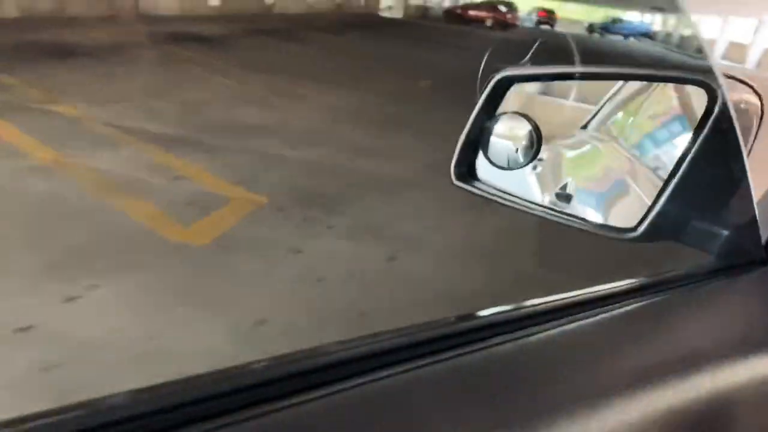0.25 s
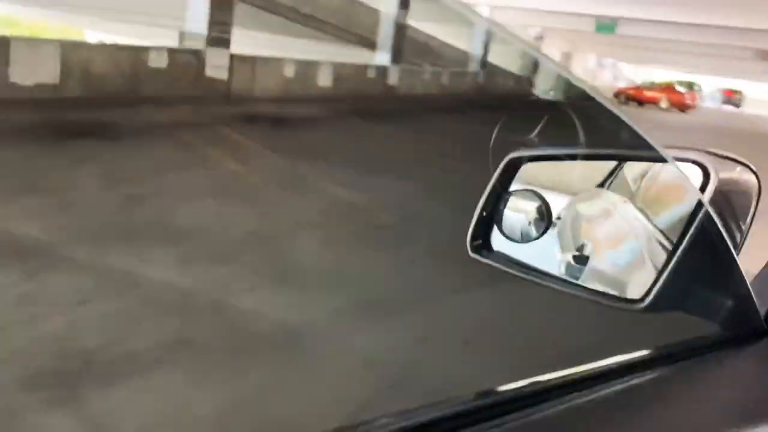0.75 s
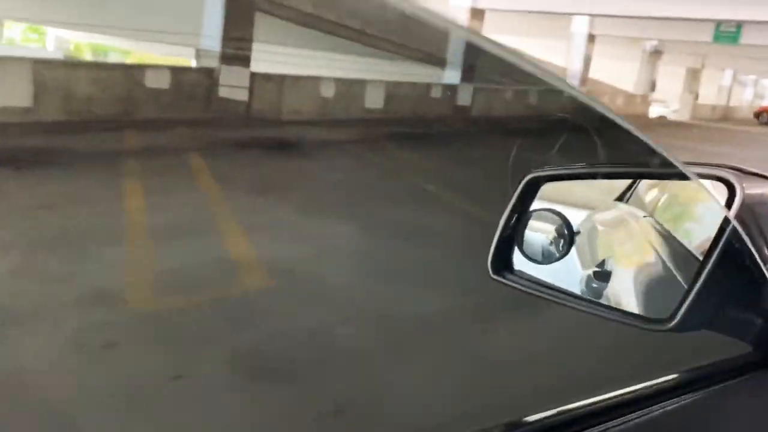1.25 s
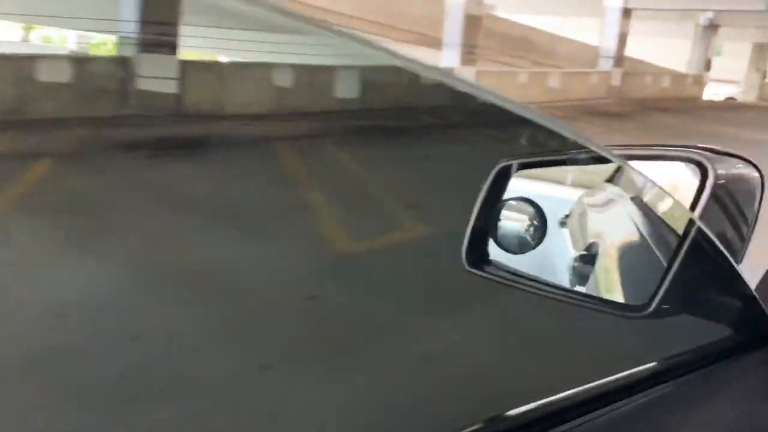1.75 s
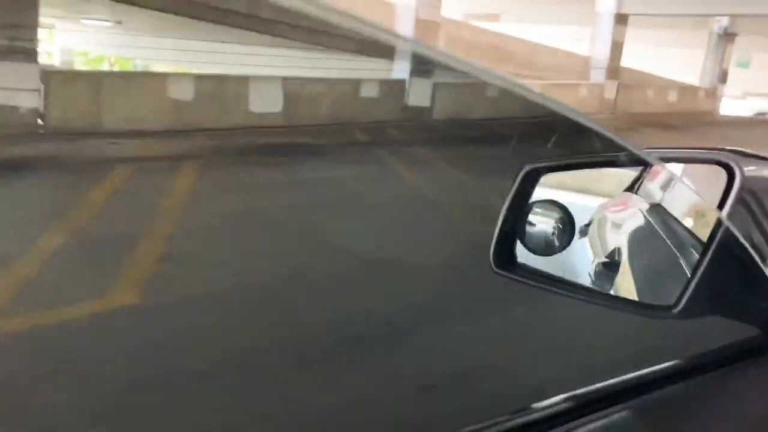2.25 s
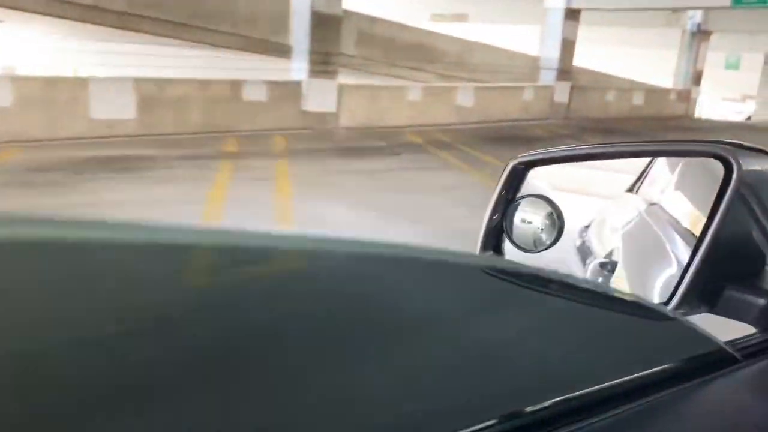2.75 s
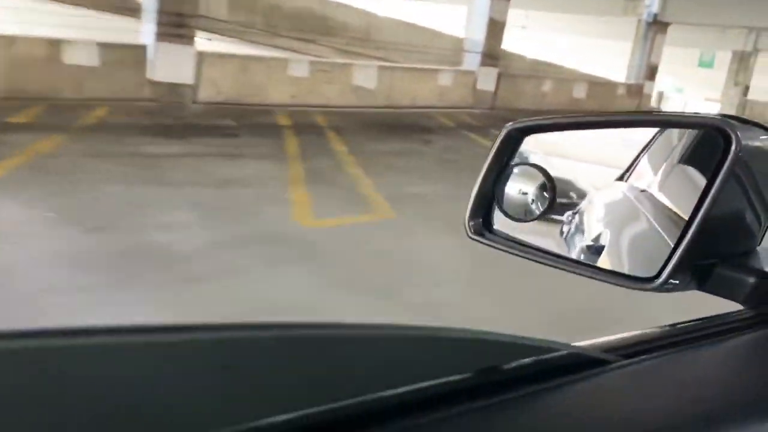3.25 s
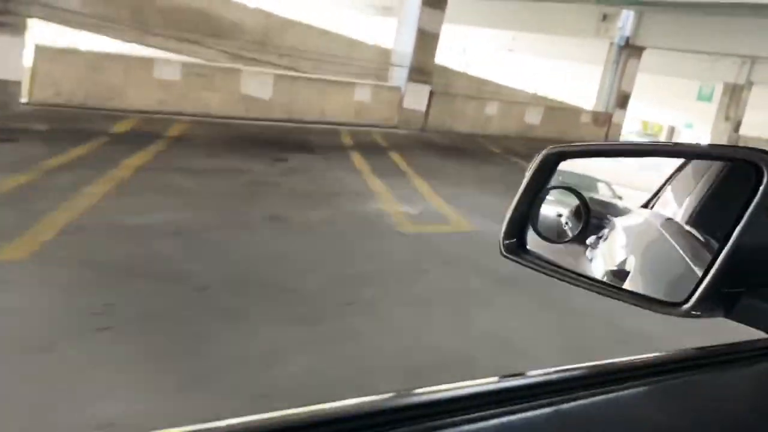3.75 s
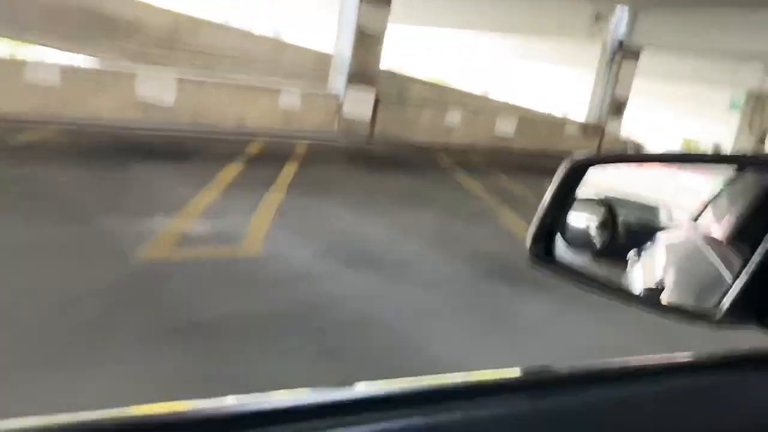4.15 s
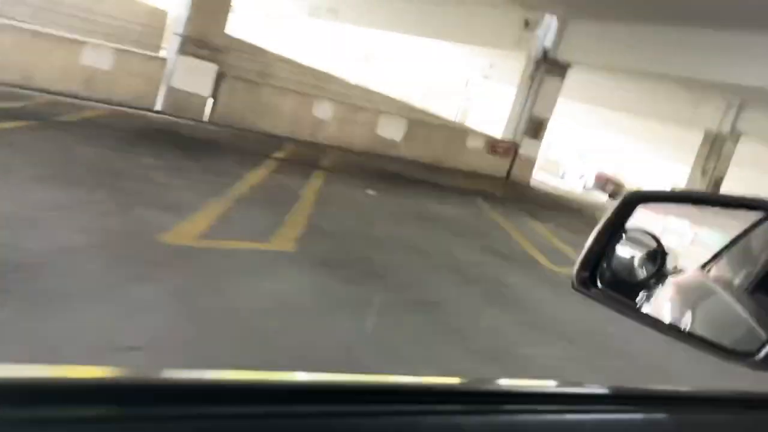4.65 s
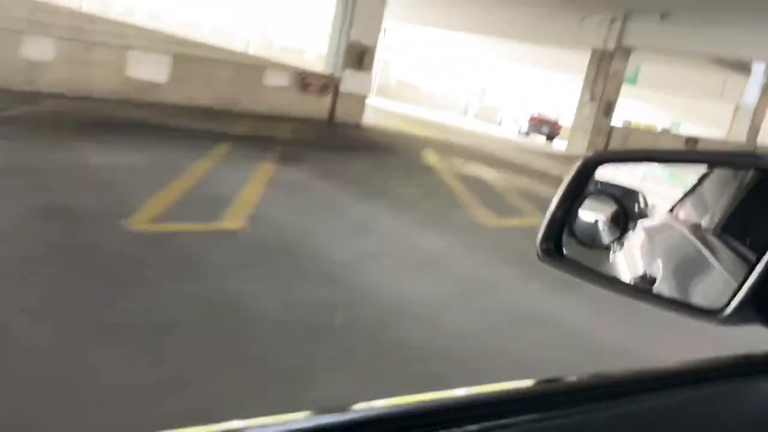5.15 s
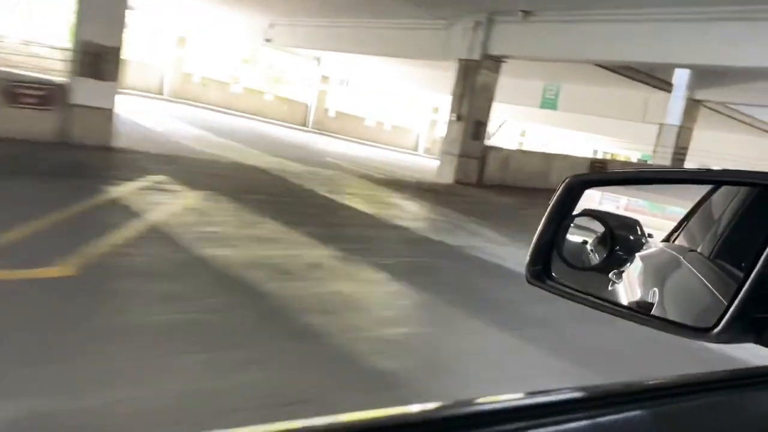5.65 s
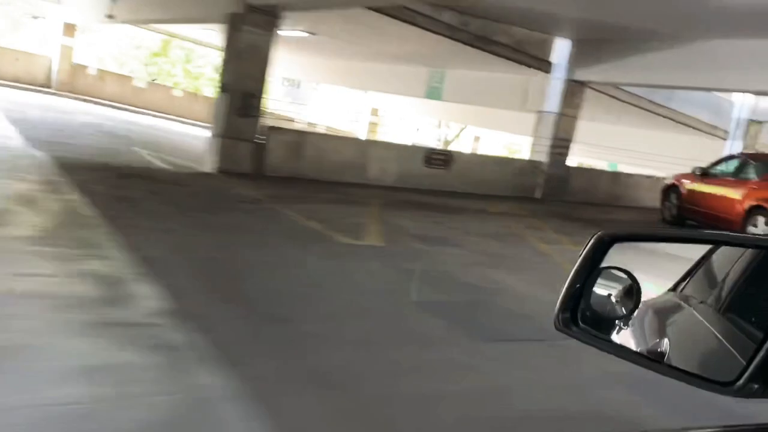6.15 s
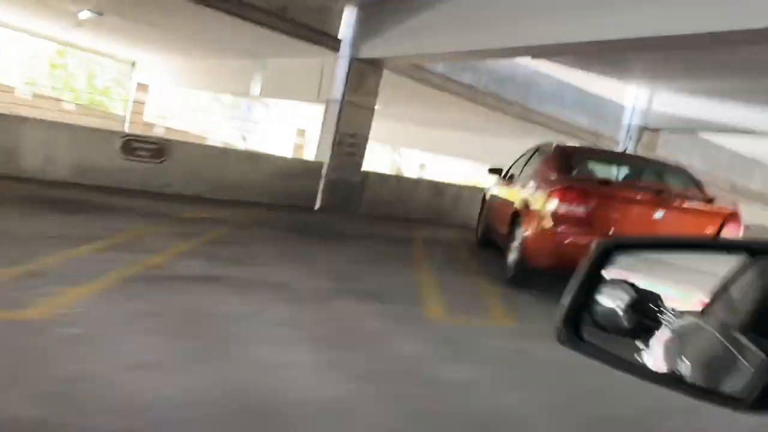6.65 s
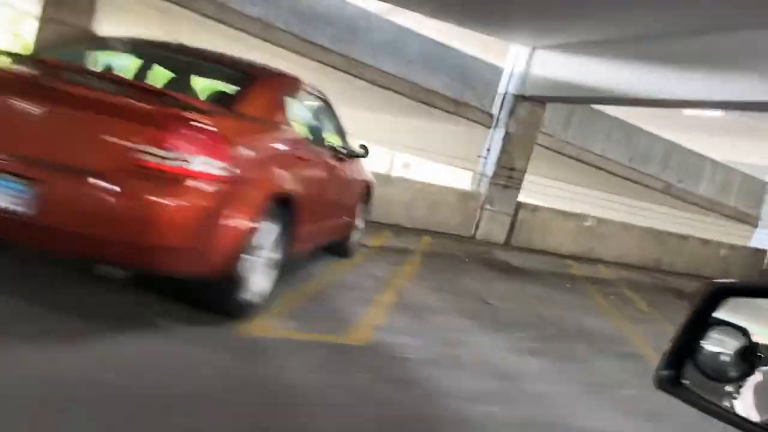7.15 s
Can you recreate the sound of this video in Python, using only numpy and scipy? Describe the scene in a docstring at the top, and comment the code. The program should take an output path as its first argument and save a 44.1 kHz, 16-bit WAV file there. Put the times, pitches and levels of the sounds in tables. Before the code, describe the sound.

Inside a car in a concrete garage, dull body knocks and low rumble, a window hums down, then the engine revs to a howling growl.

```python
"""A car rolls gently over concrete, its body knocking dully and its engine booming low in the cabin.
It is climbing a parking garage, heard from inside. Then the side window motors down with a hum,
and the engine revs up, eases off and pulls again. Pure tones that follow the crank make the boom and
the howl. Ringing puffs and shaped noise make the exhaust growl; shaped noise makes the intake's rasp
and hiss, the tyre rumble and the air rush. Short bursts make the knocks, and squeals come in the turn."""
import sys
import numpy as np
from scipy import signal
from scipy.fft import rfft, irfft, next_fast_len
from scipy.io import wavfile

SR = 44100
rng = np.random.default_rng(int(sys.argv[2]) if len(sys.argv) > 2 else 0)


def file_out(sig):
    """Save sig as 16-bit WAV at sys.argv[1]."""
    # one column per channel
    cols = np.atleast_2d(sig).T
    # limit, then scale
    lim = np.clip(cols, -1, 1)
    pcm = np.round(lim * 32767).astype(np.int16)
    wavfile.write(sys.argv[1], SR, pcm)


N = 325884
TIME = np.arange(N) / SR   # [s]
EARS = np.array([[1], [-1]])   # left, right


def from_db(db):
    """Decibels to gain."""
    return 10 ** (np.asarray(db) / 20)


def rms_one(x):
    """Scale so that the average of the two ears has rms 1."""
    return x / np.sqrt(np.mean(np.atleast_2d(x).mean(axis=0) ** 2) + 1e-20)


def in_time(rows):
    """Read each column of a time table at every sample."""
    s, *columns = np.transpose(rows)
    return [np.interp(TIME, s, c) for c in columns]


def at_hz(points, hz):
    """Read a frequency table, with frequency on a log scale."""
    f, value = np.transpose(points)
    return np.interp(np.log(hz + 1e-6), np.log(f), value)


def drift(rate):
    """A slow random wander with spread 1; a higher rate [Hz] wanders faster."""
    step = 40   # computed at every 40th sample, then joined by straight lines
    r = np.exp(-2 * np.pi * rate * step / SR)
    white = rng.standard_normal(N // step + 2002)
    slow = signal.lfilter([1], [1, -2 * r, r * r], white)[2000:]   # skip the filter's start
    return np.interp(np.arange(N) / step, np.arange(len(slow)), rms_one(slow))


def resonance(x, hz, width_hz):
    """A two-pole filter that rings at one frequency, with gain about 1 there."""
    r = np.exp(-np.pi * width_hz / SR)
    top = np.array([1, 0, -1]) * (1 - r * r) / 2
    return signal.lfilter(top, [1, -2 * r * np.cos(2 * np.pi * hz / SR), r * r], x + 1e-18)


def double_resonance(x, hz, width_hz):
    """The same resonance passed twice, for a cleaner ring."""
    return resonance(resonance(x, hz, width_hz), hz, width_hz)


def bursts(events, t60):
    """A loudness curve that jumps at each (time, dB) event and falls 60 dB in t60 seconds."""
    kicks = np.zeros(N)
    for s, peak_db in events:
        kicks[int(max(s, 0) * SR)] += from_db(peak_db)
    return signal.lfilter([1], [1, -from_db(-60 / (t60 * SR))], kicks + 1e-18)


# how alike the two ears are: (frequency [Hz], left-right correlation [-1 to 1])
LIKENESS = [(60, 0.85), (130, 0.87), (380, 0.67), (700, 0.15), (1300, 0.17), (2400, 0.44), (5000, 0.56),
            (15000, 0.88)]
# tilt between the ears: (frequency [Hz], left minus right [dB])
LEAN = [(130, -2), (290, 2.5), (1400, 3), (3500, 3.5), (9000, 0.5)]
RIGHT_LAG_S = 2.5e-5


def diffuse_noise(colour):
    """Shaped stereo noise, most alike in the bass and top; it reaches the left, window side first."""
    size = next_fast_len(N)
    hz = np.arange(size // 2 + 1) * SR / size
    mid, side = rfft(rng.standard_normal((2, size)))
    alike = np.clip(at_hz(LIKENESS, hz), 0, 1)
    field = np.sqrt(1 + alike) * mid + EARS * np.sqrt(1 - alike) * side
    tilt = from_db(EARS * at_hz(LEAN, hz) / 2)
    shift = np.exp(1j * np.pi * hz * EARS * RIGHT_LAG_S)
    # fade out below the first and above the last frequency of the colour
    skirts = 1 / (1 + (hz / colour[-1][0]) ** 4) / (1 + (colour[0][0] / (hz + 1)) ** 4)
    spectrum = field * tilt * shift * skirts * from_db(at_hz(colour, hz))
    return rms_one(irfft(spectrum, size)[:, :N])


# tyres and body on the concrete: (time [s], level [dB])
RUMBLE = [(0, -25), (1.0, -29), (1.6, -30.5), (2.2, -24.5), (3.0, -26), (3.6, -28.5), (5.3, -16.5),
          (6.1, -19.5), (6.78, -27), (6.92, -15), (7.39, -17)]
# colour of the rumble: (frequency [Hz], level [dB])
ROAD = [(20, -16.5), (32, -15.5), (55, -1), (85, -1.5), (140, -1), (190, -4), (260, -12), (400, -20),
        (700, -53.5)]


def road_rumble():
    """Tyres and body rumble on the concrete: deep noise that rises and falls."""
    return from_db(in_time(RUMBLE)[0]) * diffuse_noise(ROAD)


# how strongly each order follows the engine, orders 1 to 4:
# (level at full pull, before the cabin [dB], gain per dB of pull [dB], half the step at the jump [dB])
CRANK_ORDERS = [(-10, 0.09, -0.5), (-8, 0.88, 2), (-13, 0.42, -5.5), (-18, 0.5, -1.5)]
# cabin resonances that a passing order excites: (frequency [Hz], gain [dB])
CABIN = [(45, -24.5), (50, -15.5), (57, -7.5), (66, -6.5), (82, -4.5), (96, -8), (104, -5), (116, 0.5),
         (132, -4), (148, -3.5), (168, -14), (190, -7.5), (217, -4.5), (240, -18.5), (295, -12.5),
         (316, -7.5), (370, -11), (420, -8)]
# as the pull builds, the boom jumps abruptly from the third order to the second
JUMP_S, JUMP_EDGE_S, JUMP_WIDTH_S = 3.64, .02, 0.28


def order_levels(speed, pull_db):
    """Each order grows with the pull; the cabin makes some pitches louder than others. In dB."""
    since = TIME - JUMP_S
    jump = np.tanh(since / JUMP_EDGE_S) * np.exp(-(since / JUMP_WIDTH_S) ** 2)
    levels = []
    for k, (db, follows, jump_db) in enumerate(CRANK_ORDERS):
        engine_db = db + follows * pull_db + jump_db * jump
        levels.append(engine_db + at_hz(CABIN, (k + 1) * speed))
    return levels


STEADY_FLUTTER_DB, SLACK_FLUTTER_DB = 2.0, 1.37   # flutter at full pull, and what a slack engine adds
# at high revs the first order dips slowly, several times
THROB_START_S, THROB_HZ, THROB_DIPS, THROB_DEPTH = 5.83, 5.07, 4, .48


def boom(turns, speed, pull_db, wobble):
    """The lowest crank orders pass through the body as nearly clean tones, steadier under pull."""
    out = np.zeros((2, N))
    flutter_db = STEADY_FLUTTER_DB + SLACK_FLUTTER_DB * (1 - from_db(pull_db))
    # starts and ends on a quarter beat, where the throb leaves the level alone
    beats = np.clip((TIME - THROB_START_S) * THROB_HZ, -1 / 4, THROB_DIPS - 3 / 4)
    throb = 1 - THROB_DEPTH * np.cos(2 * np.pi * beats)
    for k, level_db in enumerate(order_levels(speed, pull_db)):
        phase = 2 * np.pi * ((k + 1) * turns + rng.random()) + wobble * drift(22)
        apart = 0.12 * (k + 1) * drift(3.6) * EARS   # reflections shift as the car moves
        gain = from_db(level_db + flutter_db * drift(13.9))
        if k == 0:
            gain = gain * throb
        out += np.sqrt(2) * gain * np.sin(phase + apart)
    return out


def garage(x, t60, likeness):
    """Dense echoes from bare concrete, partly shared by the two ears."""
    t = TIME[:2 * SR]
    mid, side = rng.standard_normal((2, len(t))) * from_db(-60 * t / t60)
    alike = np.clip(likeness, 0, 1)
    echoes = np.sqrt(1 + alike) * mid + np.sqrt(1 - alike) * side * EARS
    echoes = echoes / np.sqrt(np.sum(echoes ** 2) / 2)
    return signal.fftconvolve(x[None], echoes, axes=1)[:, :N]


# ringing of the exhaust pipe: (frequency [Hz], width of each of two passes [Hz], level [dB])
PIPE_MODES = [(250.6, 60, 4.5), (328.5, 52, 5), (454, 75, 3), (533, 100, 3.5), (630, 73, 2), (788, 100, -3),
              (1570, 730, -7)]
SURGE_TURNS = .04   # the firing wanders ahead of or behind the mean crank by about this much


def exhaust(turns, uneven, limp, direct, count=6):
    """One puff per firing, each cylinder with its own strength, rings the pipe; the garage prolongs it."""
    wander = SURGE_TURNS * drift(7)
    firing = np.floor((turns + wander - wander[0]) * count / 2).astype(int)   # two turns fire them all
    at = np.flatnonzero(np.diff(firing)) + 1
    cylinder = 2 * np.pi * firing[at] / count
    pattern = 1 + uneven * np.cos(2 * cylinder) + limp * np.cos(cylinder)
    puffs = np.zeros(N)
    puffs[at] = pattern * (1 + .07 * rng.standard_normal(N)[at])
    turn_rate = np.gradient(turns)
    puffs *= np.sqrt(turn_rate.mean() / turn_rate)   # faster puffs are smaller
    pipe = np.zeros(N)
    for k, (hz, width, db) in enumerate(PIPE_MODES):
        pipe += (-1) ** k * from_db(db) * double_resonance(puffs, hz, width)
    return rms_one(direct * pipe + garage(pipe, t60=1.4, likeness=.35))


# balance of puffs against turbulence: (time [s], share of puffs [0 to 1])
PUFF_SHARE = [(2.2, .1), (3.1, .45), (4.4, .72), (5.7, .78), (6.15, .68), (6.5, .25), (6.95, .3)]
# colours of the turbulence and of the roar: (frequency [Hz], level [dB])
GROWL = [(200, -17.5), (290, -0.5), (360, -2.5), (440, -6), (620, -7), (760, -9), (920, -9.5), (1500, -8)]
ROAR = [(520, -7), (780, -2), (1050, -13.5), (1500, -11.5)]


def growl(turns, level_db, puffs_db, turbulence_db, roar_db):
    """Exhaust puffs take over from turbulence under a steady pull; loud exhaust also roars."""
    share, = in_time(PUFF_SHARE)
    throttle_db = 2 * np.minimum(level_db + 20, 0)   # the roar fades below -20 dB of exhaust
    turbulence = from_db(turbulence_db + 1.8 * drift(6.8)) * diffuse_noise(GROWL)
    puffs = from_db(puffs_db) * exhaust(turns, uneven=1.5, limp=.8, direct=.55)
    roar = from_db(roar_db + throttle_db) * diffuse_noise(ROAR)
    return from_db(level_db) * (np.sqrt(1 - share) * turbulence + np.sqrt(share) * puffs + roar)


RASP_PATCHY_DB, RASP_PATCH_RATE_HZ = 2.6, 2.2   # how far and how fast the bands come and go


def patchy_noise(colour, count=16):
    """Noise whose narrow bands each swell and fade on their own."""
    noises = diffuse_noise(colour), diffuse_noise(colour)   # neighbouring bands take turns
    edges = np.r_[400, np.geomspace(1000, 3800, count - 1), 7000]   # [Hz]
    out = np.zeros((2, N))
    for k in range(count):
        band_filter = signal.butter(2, edges[k:k + 2], "band", fs=SR, output="sos")
        band = signal.sosfilt(band_filter, noises[k % 2])
        out += band * from_db(RASP_PATCHY_DB * drift(RASP_PATCH_RATE_HZ))
    return rms_one(out)


CHOKE_DB = -39.5   # intake level above which more flow turns into hiss rather than rasp


def follow_intake(intake_db, law):
    """A level in dB that follows the intake with one slope below the choke point and another above."""
    level_db, below, above = law
    excess = intake_db - CHOKE_DB
    return level_db + below * np.minimum(excess, 0) + above * np.maximum(excess, 0)


# how rasp and hiss follow the intake: (level at the choke point [dB], slope below it [dB per dB],
# slope above it [dB per dB])
RASP_LAW = (-29, 1.6, 0.24)
HISS_LAW = (-41.5, 0.88, 1.42)
# colours of the two noises: (frequency [Hz], level [dB])
RASP = [(800, -17), (1030, -10), (1280, 1), (1480, -0.5), (1720, 3.5), (2150, -4), (2500, -3.5),
        (2900, -8.5), (3600, -13), (5000, -26)]
HISS = [(1200, -18), (2200, -1), (3200, -3.5), (4200, -6.5), (5200, -11), (6600, -13), (10000, -31.5)]


def intake(turns, intake_db):
    """Air drawn into the engine: a rasp that throbs with the crank; at high flow a hiss takes over."""
    angle = 2 * np.pi * turns
    throb = 1 + .15 * np.cos(angle) + .11 * np.cos(2 * angle) + .15 * np.cos(3 * angle)
    rasp_db = follow_intake(intake_db, RASP_LAW) + .5 * drift(10)
    hiss_db = follow_intake(intake_db, HISS_LAW) + .5 * drift(13.0)
    return from_db(rasp_db) * throb * patchy_noise(RASP) + from_db(hiss_db) * diffuse_noise(HISS)


# colour of the rushing air: (frequency [Hz], level [dB])
AIR = [(7000, -6), (9500, 0), (20000, -2)]
AIR_DB, AIR_SPEED_POWER = -70, 1.68   # level at the starting engine speed; grows as this power of it
SWELL_S, SWELL_WIDTH_S, SWELL_DB = 6.02, 0.096, -46   # a brief swell around top engine speed


def air_rush(speed):
    """A thin rush of air that rises with engine speed and swells once."""
    swell = from_db(SWELL_DB) / (1 + ((TIME - SWELL_S) / SWELL_WIDTH_S) ** 4)
    steady = from_db(AIR_DB) * (speed / speed[0]) ** AIR_SPEED_POWER
    return (steady + swell) * diffuse_noise(AIR)


# dull knocks of the body, the last as the window starts down: (time [s], relative strength [dB], hardness:
# extra clatter [dB])
KNOCKS = [(0.018, -31, 9.5), (0.079, -24.5, 6), (0.118, -28, 4), (0.156, -21, 1.5), (0.192, -30, 1),
          (0.217, -37, 1), (0.251, -33, 6), (0.317, -26, -15), (0.367, -16.5, -3.5), (0.4, -35.5, 16.5),
          (0.551, -24, 4), (0.564, -25, 2), (0.615, -28, -18), (0.71, -25, -9), (0.753, -27, -7),
          (0.783, -24, -5), (0.818, -19.5, -13), (0.843, -24, -9), (0.889, -18.5, -1), (0.991, -23, -6),
          (1.022, -25.5, -6), (1.05, -28, -7), (1.067, -24, -14), (1.301, -25, -2), (1.318, -28, -6),
          (1.436, -31, -11), (1.445, -23, -8), (1.528, -30, -8), (1.711, -26, -14), (2.146, -18, -4)]
# padded body panels: (frequency [Hz], width [Hz], relative level [dB])
BODY_MODES = [(300, 57, 0.5), (409, 45, 0.5), (510, 68, -10), (800, 100, -5.5)]
# colours of the dull rattle and of the clatter: (frequency [Hz], level [dB])
KNOCK_COLOUR = [(130, 16.5), (220, 6.5), (350, 4.5), (550, -0.5), (800, -16), (1100, -38)]
CLATTER_COLOUR = [(420, -5), (560, 4.5), (800, -4.5), (1100, -14), (1700, -18)]
PADDING_HZ = 1550   # the trim's padding dulls the knocks above this


def knocks(level_db, ring_s, thud_db, clatter_db, clatter_s):
    """Loose trim hits damped panels, and the starting window jolts them once: a short thud and a dull rattle;
    harder blows clatter more."""
    blows = [(s, db) for s, db, _ in KNOCKS]
    hard_blows = [(s, db + hard_db) for s, db, hard_db in KNOCKS]
    pushes = bursts(blows, t60=0.0039)
    thuds = np.zeros(N)
    for k, (hz, width, db) in enumerate(BODY_MODES):
        thuds += (-1) ** k * from_db(thud_db + db) * resonance(pushes, hz, width)
    rattle = from_db(level_db) * bursts(blows, t60=ring_s) * diffuse_noise(KNOCK_COLOUR)
    clatter = from_db(clatter_db) * bursts(hard_blows, t60=clatter_s) * diffuse_noise(CLATTER_COLOUR)
    padding = signal.butter(4, PADDING_HZ, fs=SR, output="sos")
    return signal.sosfilt(padding, thuds + rattle + clatter)


# small sharp clicks at the door: (time [s], relative strength [dB])
CLICKS = [(1.521, -45), (2.325, -41), (2.340, -38), (2.344, -31)]
# their colour: (frequency [Hz], level [dB])
CLICK_COLOUR = [(1500, -14), (4300, -1), (5500, -6), (7300, 1), (9000, -10), (15500, -6)]


def clicks(crack_db, tail_db):
    """Hard plastic ticks with a brief tail in the cabin."""
    crack = from_db(crack_db) * bursts(CLICKS, t60=0.014)
    tail = from_db(tail_db) * bursts(CLICKS, t60=0.084)
    return (crack + tail) * diffuse_noise(CLICK_COLOUR)


# the hollow ring: (time [s], level [dB])
HOLLOW = [(2.1, -65), (2.8, -48), (3.45, -32), (4.1, -36), (4.8, -33), (6.1, -36), (6.7, -43), (6.95, -30),
          (7.39, -24)]
HOLLOW_HZ = 613.4


def hollow(width_hz):
    """A narrow hollow ring, noise through a sharp resonance, that comes in as the glass drops."""
    ring = double_resonance(diffuse_noise(GROWL), HOLLOW_HZ, width_hz)
    return from_db(in_time(HOLLOW)[0]) * rms_one(ring)


# tones of the window motor: (multiple of the motor speed [1], level before flutter [dB])
MOTOR_ORDERS = [(1, -29), (4, -44), (8, -48)]
# the motor takes up its slack with a clack and runs until the glass is down
WINDOW_START_S, WINDOW_STOP_S, MOTOR_HZ = 2.146, 3.65, 75.3
CLACK_DB, MOTOR_FLUTTER_DB = -35, 2


def window(slide_db):
    """A sharp clack, then the motor hums and the glass slides in its seal."""
    start = np.clip((TIME - WINDOW_START_S) / 0.1, 0, 1)
    stop = np.clip((WINDOW_STOP_S - TIME) / 0.063, 0, 1)
    turns = np.cumsum(MOTOR_HZ * (1 + 0.0051 * drift(5.2))) / SR
    hum = np.zeros(N)
    for k, db in MOTOR_ORDERS:
        gain = from_db(db + MOTOR_FLUTTER_DB * drift(12.0))
        hum += np.sqrt(2) * gain * np.sin(2 * np.pi * k * turns)
    clack_noise = diffuse_noise(RASP) + .5 * diffuse_noise(HISS)
    clack = bursts([(WINDOW_START_S, CLACK_DB)], t60=0.036) * clack_noise
    slide = from_db(slide_db) * diffuse_noise(AIR)
    return clack + start * stop * (hum + slide)


# the upper crank orders howl out in each surge: (time [s], relative level [dB])
HOWL = [(2.6, -52), (3.4, -38), (4.3, -34), (5.18, -31), (5.33, -23.5), (5.55, -35), (5.8, -33),
        (6.03, -25), (6.24, -27.5), (6.4, -42), (6.8, -50), (6.95, -34)]
# their colour: (frequency [Hz], level [dB])
HOWL_COLOUR = [(210, -9), (265, 1), (320, -3), (355, -7), (415, 3), (520, -3), (630, -1), (720, -9),
               (950, -10)]


def howl(turns, speed, count=16):
    """The upper crank orders rise and fall together; shifting reflections roughen each one."""
    out = np.zeros((2, N))
    for k in range(3, count):
        phase = 2 * np.pi * (k * turns + rng.random())
        steady = np.sin(phase + .5 * drift(3) * EARS)
        scattered = drift(14) * np.sin(phase) + drift(14) * np.cos(phase)
        out += from_db(at_hz(HOWL_COLOUR, k * speed)) * (1.1 * steady + .65 * scattered)
    return from_db(in_time(HOWL)[0]) * out


# tyres scrub in the turn: (middle [s], half length [s], frequency [Hz],
# width of each of two passes [Hz], level [dB])
SQUEALS = [(3.254, 0.42, 1435, 612, -40), (4.33, 0.18, 2580, 300, -36.5), (5.05, .12, 2780, 222, -35),
           (5.7, 0.19, 2620, 280, -34), (5.95, .1, 2030, 240, -26.5)]


def tyre_squeal():
    """The tyres scrub on the smooth concrete in the turn: brief, breathy squeals."""
    scrub = diffuse_noise(RASP)
    out = np.zeros((2, N))
    for s, half_s, hz, width, db in SQUEALS:
        swell = np.exp(-((TIME - s) / half_s) ** 2)
        out += from_db(db) * swell * rms_one(double_resonance(scrub, hz, width))
    return out


DRONE_S, DRONE_HALF_S, DRONE_HZ, DRONE_DB = 6.67, 0.23, 104, -14


def drone():
    """A low steady tone that sets in and hangs on while the engine eases off."""
    held = from_db(DRONE_DB) / (1 + ((TIME - DRONE_S) / DRONE_HALF_S) ** 12)
    return np.sqrt(2) * held * np.sin(2 * np.pi * (DRONE_HZ * TIME + rng.random()))


# engine speed: (time [s], crank speed [turns per s])
CRANK = [(0.0, 46.4), (1.3, 44.8), (2.8, 42.9), (3.1, 45.1), (3.5, 48.3), (4.1, 56.4), (4.9, 67.3),
         (5.3, 77.4), (5.48, 81.5), (5.6, 88.0), (5.7, 90.5), (5.82, 101.5), (5.97, 105.7), (6.3, 103.0),
         (6.7, 100.8), (6.95, 98.0), (7.39, 87.4)]
# how hard the engine pulls on its mounts: (time [s], pull relative to full pull [dB])
PULL = [(0, -32), (.97, -42), (1.1, -22), (2.03, -17.5), (2.2, -12), (2.6, -21.5), (3.15, -5), (3.45, -5),
        (3.7, 3.5), (4.25, -9.5), (5.25, 3.5), (5.65, -8.5), (6.1, -5), (6.3, -12), (6.45, -20),
        (6.78, -16.5), (7.0, -5.5), (7.39, 0)]
# the two ends of the engine: (time [s], exhaust drive [dB], intake drive [dB])
LOAD = [(0.0, -35.5, -55), (0.85, -38, -54.5), (1.7, -37.5, -55), (2.7, -36.5, -53), (3.1, -29, -50),
        (3.65, -22.5, -40), (4.2, -21.5, -40), (4.72, -20.5, -40.5), (4.98, -17.5, -33.5),
        (5.3, -16.5, -34), (5.72, -19, -30.5), (6.06, -15, -28.5), (6.42, -23, -42), (6.82, -25, -47),
        (6.91, -19.5, -50), (7.39, -16.5, -36.5)]


def scene():
    """The crank drives boom, puffs, howl and the throb of the rasp; the tyres rumble underneath."""
    (speed,), (pull_db,), (exhaust_db, intake_db) = in_time(CRANK), in_time(PULL), in_time(LOAD)
    turns = np.cumsum(speed) / SR
    road = road_rumble() + tyre_squeal()
    cabin = boom(turns, speed, pull_db, wobble=0.17) + drone() + hollow(width_hz=39)
    pipe = growl(turns, exhaust_db, puffs_db=-6.0, turbulence_db=-3.5, roar_db=-9.0) + howl(turns, speed)
    air = intake(turns, intake_db) + air_rush(speed)
    body = knocks(level_db=0.5, ring_s=.07, thud_db=10, clatter_db=-8, clatter_s=.06)
    door = clicks(crack_db=-5.5, tail_db=-16.5) + window(slide_db=-69.5)
    return road + cabin + pipe + air + body + door


CUTOFF_HZ = 15850


def record(dry):
    """The highest peaks are rounded, the sound fades in over 5 ms and the top is cut."""
    rounded = dry / (1 + (dry / .98) ** 8) ** (1 / 8)
    faded = rounded * np.minimum(TIME / .005, 1)
    return signal.sosfilt(signal.ellip(10, .1, 80, CUTOFF_HZ, fs=SR, output="sos"), faded)


dry = scene()
out = record(dry)
file_out(out)
```